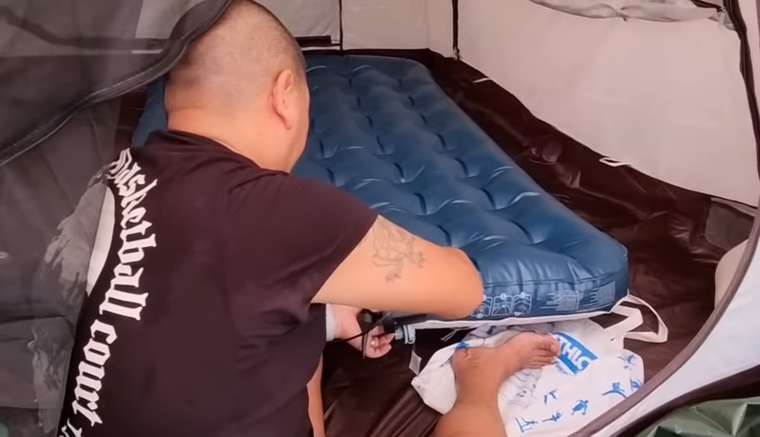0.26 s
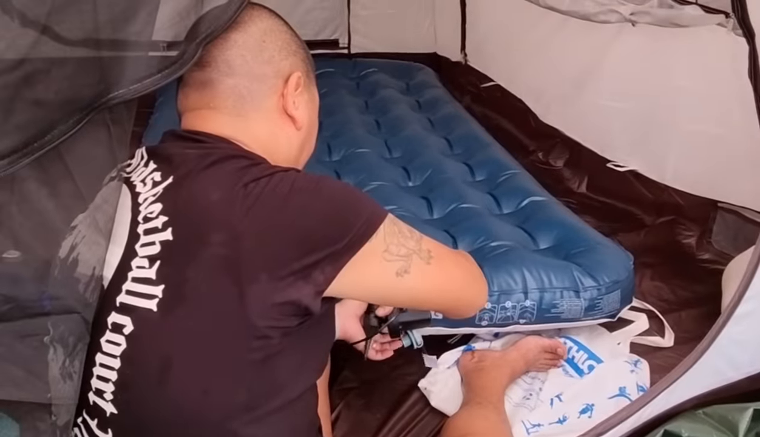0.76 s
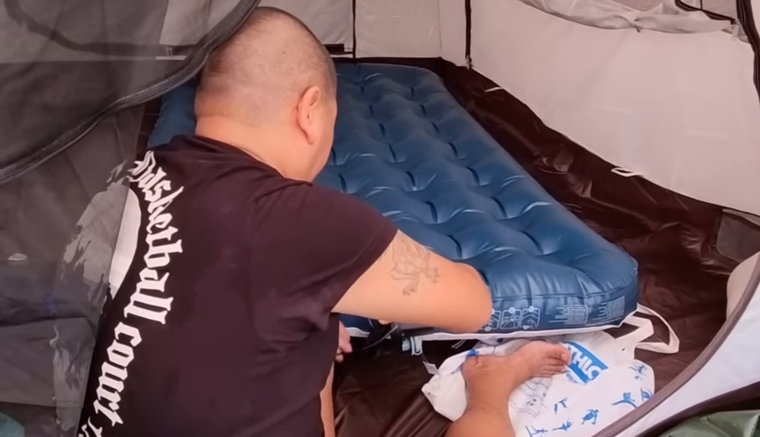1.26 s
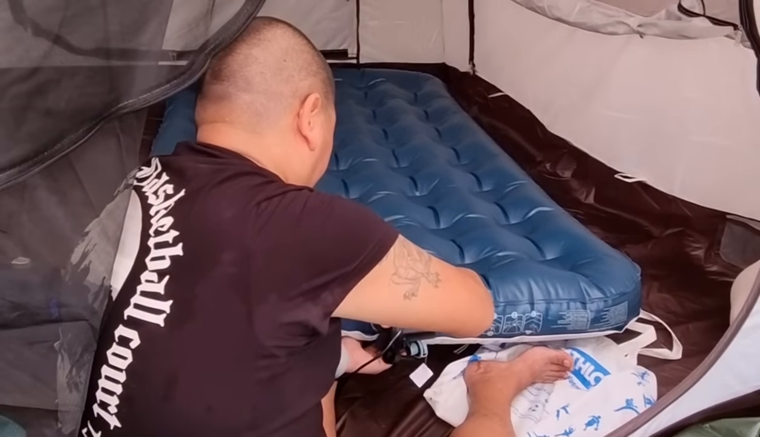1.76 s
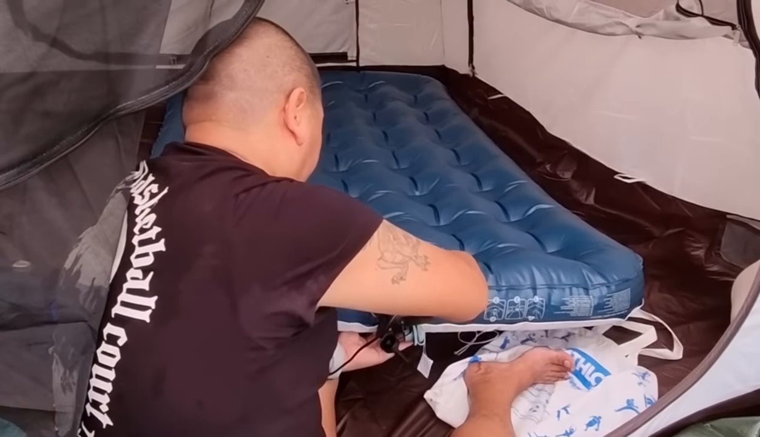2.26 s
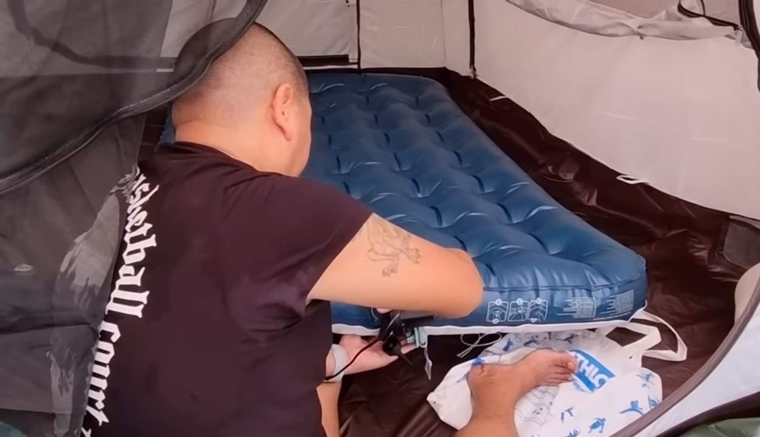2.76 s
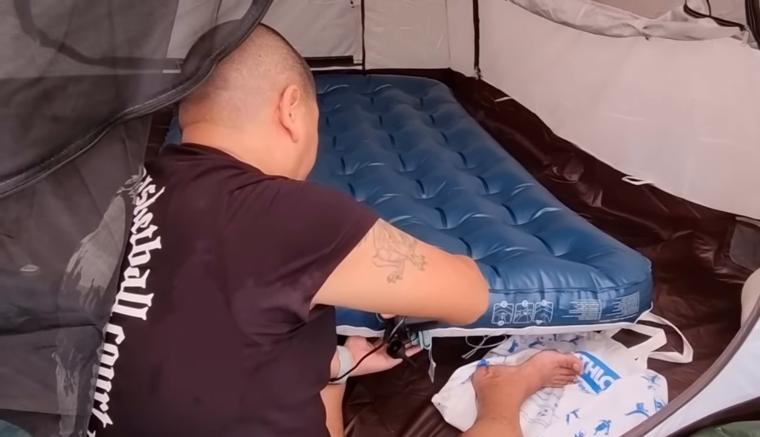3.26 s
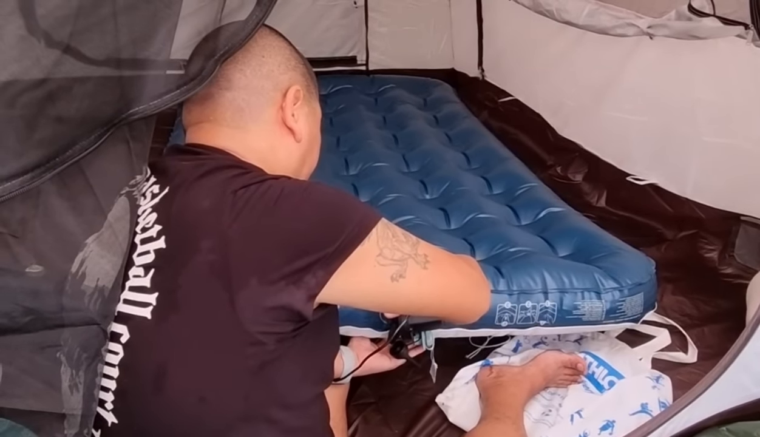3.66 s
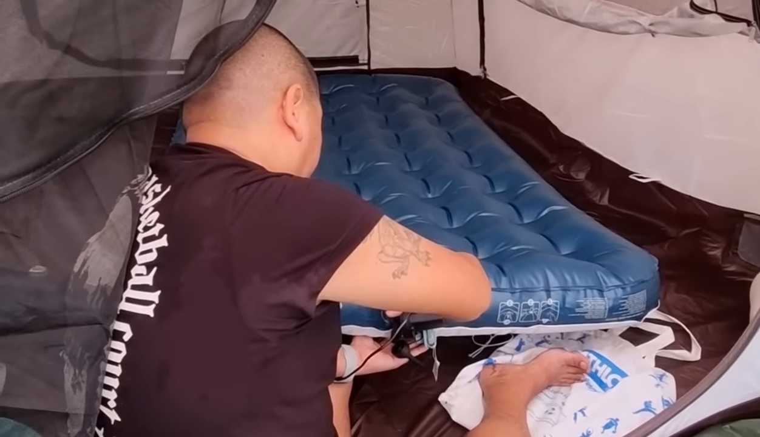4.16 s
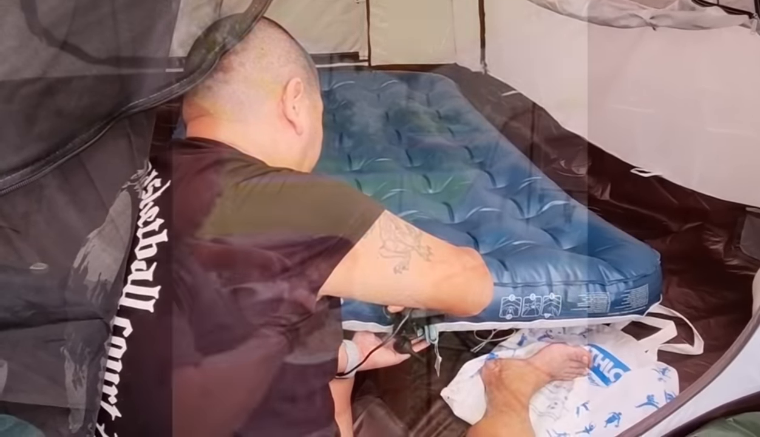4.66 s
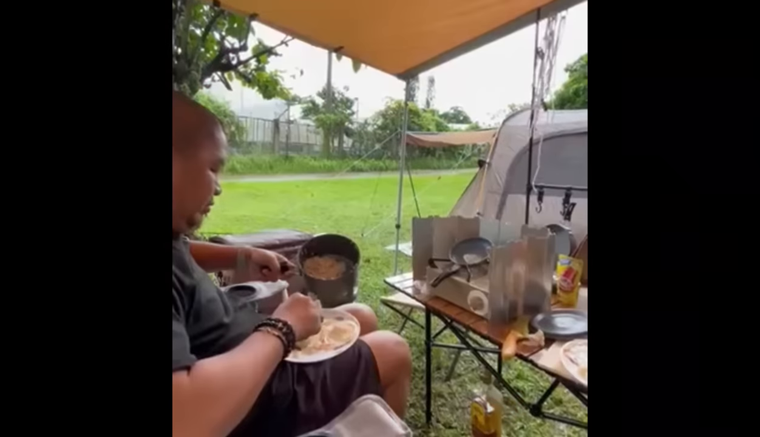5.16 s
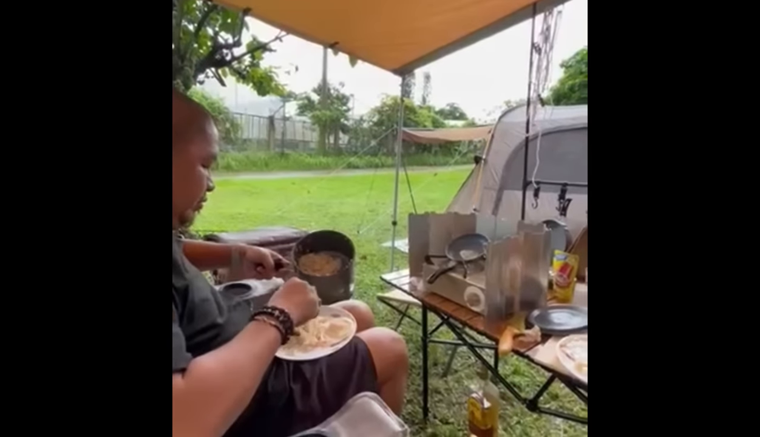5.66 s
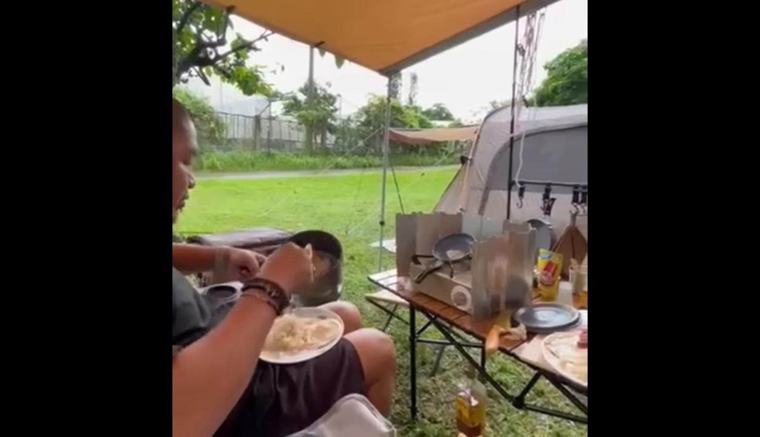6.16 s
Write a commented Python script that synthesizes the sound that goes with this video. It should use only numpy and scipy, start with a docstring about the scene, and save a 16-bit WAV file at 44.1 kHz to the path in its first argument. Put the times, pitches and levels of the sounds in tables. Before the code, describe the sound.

Close in a tent, a small electric pump whirs with a low hum, piercing whine and airy hiss. A light knock comes near one second, then the sound grows fuller as the nozzle seats, with pitch creeping upward. It cuts off abruptly, leaving a tiny silence, then a much quieter open campsite: distant traffic, short gritty rustles and soft taps of spoon, plate and pan.

```python
"""Small electric pump filling an air mattress in a tent: the shaft hums, its overtones whine and turbulent
air rings the housing and hisses, fuller once the nozzle is home in the valve; the motor slowly gains speed.
The pump sound is cut off abruptly. After a short silence comes a quiet open campsite: shaped noise and wavering
engine notes for distant traffic, short gritty noise bands that swell and die away, and struck resonances
for the soft taps of a meal."""
import sys
import numpy as np
from scipy import signal
from scipy.fft import rfft, irfft
from scipy.io import wavfile

SR = 44100
rng = np.random.default_rng(int(sys.argv[2]) if len(sys.argv) > 2 else 0)


def dump_mix(stems):
    """Bounce the given channels to the path in sys.argv[1] as a 16-bit WAV at rate SR."""
    frames = np.atleast_2d(stems).T  # one column per channel
    limited = np.clip(frames, -1, 1)  # hard clip at full scale
    pcm = np.round(limited * 32767).astype(np.int16)
    wavfile.write(sys.argv[1], SR, pcm)


N = 282681
TIME = np.arange(N) / SR
FREQ = np.arange(N // 2 + 1) * SR / N

# Motor speed, creeping up as the filling mattress throttles the flow. Each row: time in seconds, turns per second.
SPEED = [(0.06, 258.5), (0.24, 258.7), (0.36, 259.9), (0.48, 259.7), (1.32, 263.1), (1.44, 263.2),
         (2.44, 265.6), (3.04, 267.2), (3.58, 267.8), (3.78, 268.4), (4.32, 269.1), (4.7, 269.1)]
# How far the nozzle is pressed into the valve. Each row: time in seconds, seat from 0 (loose) to 1 (home).
SEAT = [(0, 0.147), (.45, 0.093), (.75, 0.132), (1.14, 0.25), (1.29, 0.677), (1.47, 0.522), (1.6, 0.376),
        (1.72, 0.474), (1.81, 0.52), (2.07, 0.748), (2.15, 0.515), (2.21, 0.86), (2.32, 0.892),
        (2.48, 0.846), (3.1, 0.886), (4.1, 1), (4.75, 0.968)]
# Overtones of shaft and blades. Each row: multiple of the shaft rate, level in dB before trim with the nozzle
# loose, half in and home, left minus right in dB, phase lead of the left ear in radians.
WHINE = [(2, -61, -70.5, -52, 6.5, 0.0), (3, -42.5, -44, -35, -21.5, 1), (4, -65.5, -57, -44, -4.5, -0.4),
         (5, -38, -46.5, -41, 3, 2), (7, -42, -53, -41.5, -5.5, -2), (8, -50.5, -65, -53, -3, 3),
         (9, -49, -54, -50, -16.5, 1.5), (10, -62.5, -49, -51, -1.5, 1), (11, -51, -59.5, -54.5, 3.5, -2.5),
         (15, -58.5, -54.5, -62.5, -3.5, -5.5), (17, -52, -65.5, -51, -10.5, -3),
         (19, -71, -67.5, -58, 0, 1), (25, -53.5, -59, -59, -3, -1.35), (36, -52, -59.5, -62.5, -5, 2.5),
         (40, -65, -65, -58, -7.5, 3.5), (42, -67, -79, -65, 0, -1), (50, -59.5, -67, -61.5, -2, 1.5),
         (54, -65, -65.5, -62, -0.5, 0)]
# Piercing overtones with level curves of their own. Each row: multiple of the shaft rate, left minus right in dB
# loose and home, lead of the left ear in radians loose and home, list of (time in seconds, level in dB).
PIERCING = [(6, 0, -4, -3.14, -1.4, [(0, -39), (.88, -40), (1, -48), (2.7, -50), (3.3, -46), (4.7, -45)]),
            (12, 0, -7, -3.0, -1.7, [(0, -43), (.5, -49), (.8, -60), (1, -53), (1.1, -45), (1.3, -45),
            (1.42, -41.5), (1.95, -42.5), (2.05, -50), (2.6, -44), (3, -41), (4.15, -43), (4.36, -50),
            (4.7, -48)]), (13, -2, -14, 2.5, 4.2, [(0, -51), (.2, -46), (.84, -54), (1.24, -52), (2.2, -53),
            (2.9, -49), (3.18, -55), (3.86, -51), (4.3, -44), (4.7, -42)]),
            (14, -5, -5, -0.7, -1.9, [(0, -58), (.38, -56), (.5, -50), (.8, -47.5), (1.08, -48),
            (1.25, -56), (2.2, -57), (2.78, -52), (2.96, -64)]), (16, -2, -6, 0.6, 2.2, [(0, -49),
            (.26, -48), (.4, -54), (.98, -57), (1.12, -48), (1.6, -52), (1.78, -58), (2.48, -52),
            (2.92, -57), (4.7, -56)]), (18, -4, -6, -0.7, 1.2, [(0, -50), (.37, -51), (.5, -60), (.9, -61),
            (.97, -49), (1.3, -55), (2, -54), (2.4, -58), (4.75, -56)]),
            (24, 0, -1, -3.1, -2.2, [(0.06, -56), (0.36, -74), (1.08, -52), (1.28, -64), (1.42, -55),
            (1.82, -61), (2.6, -57), (2.98, -48), (3.4, -62), (4.22, -59), (4.7, -55)]),
            (30, -2, -3, 1.4, 2.0, [(0, -54), (.22, -48), (.65, -50.5), (.88, -58), (1.28, -51),
            (1.58, -59), (1.9, -50.5), (2.35, -61), (2.9, -51), (3.5, -54), (4.7, -61)]),
            (35, 0, 4, 3.6, 4.2, [(0.06, -59), (0.36, -62), (0.52, -70), (0.68, -57), (1.14, -60),
            (1.92, -54), (2.1, -61), (2.46, -50), (2.62, -60), (3.82, -62), (4.5, -53), (4.7, -58)]),
            (48, -2, -5, 2, 1.8, [(0, -72), (4.1, -68), (4.3, -59), (4.7, -58)])]
# Air resonances of the housing. Each row: centre in Hz, width in Hz, level in dB relative to the rush level,
# left minus right in dB, phase lead of the left ear in radians, dB lost with the nozzle loose.
HOUSING = [(636.4, 41.3, -16, -4, -2, -5), (791.46, 51.2, -4.5, -12, -3, -2.5),
           (841.8, 54.9, -2.5, -11, 1.81, 0), (913.5, 41.5, -13.5, 17.5, 0.5, -9.5),
           (972.1, 63.7, 1.5, -2, -2, 5), (1114.3, 96, -4, -10.5, -1.5, -1.5),
           (1287, 174, -17.5, 4.5, -2, 1.5), (1504.6, 47.8, -7.5, -11.5, 5, 4),
           (1585.5, 48, -12, -7, -1, 3), (1873.6, 102, -15, 1.5, -1.5, -2.5),
           (2629, 108, -10, -5.5, 2.5, 8), (2860.3, 86.4, -15, 2.5, -3, 4), (3155, 244, -16.5, -2, 2, 2),
           (3620, 186, -21.5, -7, 2.5, 3.5), (5207, 488, -24, -2.5, 2, -2.5),
           (6550, 740, -27, -3.5, -2.5, 2)]
# Hiss of the air jet. Each row: frequency in Hz, level in dB per Hz before trim and lean, loose and home.
JET = [(200, -77.5, -77), (379, -78, -79), (512, -80.5, -77.5), (728, -77.5, -73), (1394, -78, -73),
       (1695, -79.5, -76), (1894, -80, -79.5), (2356, -75.5, -74), (3480, -83.5, -78.5), (4210, -77, -77),
       (5320, -83, -80), (5610, -86, -85), (6040, -83, -81.5), (6250, -82.5, -79.5), (6960, -83, -79.5),
       (10950, -89, -82), (11020, -89, -86.5), (15500, -85, -83)]
# Whistle at the gap round the nozzle. One row: end in seconds, length in seconds (negative: it runs back from
# the end), peak rms in dB, centre in Hz, width in Hz.
LEAK = (1.65, -0.01, -45, 4271, 41.5)
# Nozzle against valve. Each row: start in seconds, peak in dB, centre in Hz, width in Hz, t60 in seconds.
KNOCKS = [(0.949, -25.5, 1300, 1100, 0.033)]
# Spoon, plate and pan. Each row: start in seconds, peak in dB before low-pass and pan, centre in Hz,
# width in Hz, t60 in seconds.
TAPS = [(4.941, -37.5, 480, 280, .045), (5.064, -42, 350, 220, .045), (5.224, -35, 340, 200, .06),
        (5.627, -40.5, 600, 700, .035), (5.767, -38.5, 650, 700, .03), (5.950, -37.5, 7500, 6000, .025),
        (5.987, -35, 1600, 1600, .04), (6.223, -42, 520, 500, .035), (6.384, -37, 900, 600, .04),
        (6.387, -34.5, 320, 200, .05)]
# Short gritty noise bands in the open air. Each row: start in seconds, length in seconds, peak rms in dB before
# low-pass and pan, centre in Hz, width in Hz.
BURSTS = [(4.914, 0.082, -65, 6200, 1600), (5.121, 0.07, -61.5, 6200, 1600),
          (5.26, 0.207, -58.5, 5580, 2000), (5.41, .11, -60.5, 3400, 1700),
          (5.472, 0.055, -60.5, 6300, 1400), (5.546, 0.093, -57, 4550, 2800),
          (5.666, 0.0936, -54, 4000, 2600), (5.748, 0.072, -58.5, 4600, 2600),
          (5.815, 0.097, -58, 4900, 2600), (5.934, 0.101, -49, 2100, 2300), (6.003, .07, -63.5, 5600, 1800),
          (6.058, 0.153, -59, 5060, 1600), (6.169, 0.076, -55, 2900, 1400), (6.21, 0.06, -59.5, 5400, 1800),
          (6.366, 0.0516, -57, 5100, 2400)]
# Distant engines, levels before pan. Each row: loudest moment in seconds, firing rate in Hz, level in dB,
# fade in dB per second.
TENT_ENGINE = (0.73, 107, -42, 5.5)
FIELD_ENGINES = [(4.98, 166, -48.5, 45), (5.9, 85.23, -45, 30.56)]
# Low rumble through the tent wall, before pan. Each row: frequency in Hz, level in dB per Hz.
RUMBLE = [(20, -81.5), (45, -71), (75, -61), (110, -67), (148, -68.5), (162, -63.5), (178, -72.5),
          (230, -77.5), (310, -73), (400, -110), (800, -115)]
# Open air of the campsite, before low-pass and pan. Each row: frequency in Hz, level in dB per Hz.
FIELD = [(20, -100), (45, -67), (85, -66), (130, -72), (165, -68.5), (250, -76.5), (500, -84.5),
         (900, -84.5), (1900, -91), (2400, -90.5), (2900, -100), (4200, -101), (5300, -107), (7000, -103),
         (8300, -98.5), (10000, -109), (11500, -111), (13000, -130)]

# Levels with the nozzle loose and their rise as it goes home
HUM_DB, HUM_RISE_DB = -40.5, 5.5
RUSH_DB, RUSH_RISE_DB = -58, 6
TONE_JITTER_RAD, TONE_RUFFLE_DB = .07, 1.1
JET_FLUTTER_DB, JET_SWAY_DB = .7, .35
CLACK_DB = -17  # relative to the main resonance
PUMP_END_S, FIELD_START_S = 4.747, 4.861
TOP_HZ, FIELD_TOP_HZ = 15650, 11400


def shaft(wander=0.0002043, tremble=0.000334):
    """Motor shaft angle in radians: speed creeps up, wanders a little and trembles with the brushes."""
    turns_per_s = curves(SPEED)[0] * (1 + wander * walk(4) + tremble * walk(45))
    return 2 * np.pi * np.cumsum(turns_per_s) / SR


def hum(angle, seat, waver_db=0.5):
    """Unbalanced rotor shakes the housing once a turn, louder when pressed against the mattress."""
    level_db = HUM_DB + HUM_RISE_DB * seat + waver_db * walk(11)
    return np.sqrt(2) * np.sin(angle) * amp(level_db) * pan(-6.5)


def whine(angle, seat, trim_db=-0.2445, fade_db=2.5):
    """Shaft and blade overtones, fading as the hand shifts the pump among the tent's reflections."""
    out = np.zeros((2, N))
    for order, loose_db, half_db, home_db, side_db, lead_rad in WHINE:
        level_db = np.interp(seat, [0, .5, 1], [loose_db, half_db, home_db])
        level_db = level_db + trim_db + fade_db * walk(3.521)
        out += partial(order * angle, level_db, side_db, lead_rad)
    turned = np.interp(seat, [.18, .65], [0, 1])
    for order, loose_db, home_db, loose_rad, home_rad, levels in PIERCING:
        side_db = loose_db + turned * (home_db - loose_db)
        lead_rad = loose_rad + turned * (home_rad - loose_rad)
        out += partial(order * angle, curves(levels)[0], side_db, lead_rad)
    return out


def partial(angle, level_db, side_db, lead_rad):
    """One rotor tone, lightly ruffled by the air stream; its paths to the two ears shift slowly."""
    phase = angle + rng.uniform(0, 2 * np.pi) + TONE_JITTER_RAD * walk(50)
    gain = amp(level_db + TONE_RUFFLE_DB * walk(40))
    lead = lead_rad + .25 * walk(2.5)
    return np.sqrt(2) * gain * np.sin([phase + lead, phase]) * pan(side_db)


def rush(seat, flutter_db=0.0036):
    """Turbulence off the blades rings the air in the housing, with a minute flutter."""
    out = np.zeros((2, N))
    for hz, width_hz, db, side_db, lead_rad, loss_db in HOUSING:
        ears = pan(side_db) * np.exp(1j * np.array([[lead_rad], [0]]))
        ringing = irfft(resonance(hz, width_hz) * ears * noise(0.737), N)
        out += ringing * amp(db - (1 - seal(seat)) * loss_db)
    return out * amp(RUSH_DB + RUSH_RISE_DB * seal(seat, closed_at=0.912) + flutter_db * walk(220))


def jet(angle, seat, trim_db=0.15, chop=0.216, likeness=0.47, alike_below_hz=700, chops_per_turn=3):
    """Broad intake hiss, lightly chopped by the impeller; the lows lean right most and are partly alike."""
    lean = colour([1000, 4000, 12000], [-1.9, -1.2, -.5])
    air = noise(likeness / (1 + (FREQ / alike_below_hz) ** 4)) * np.array([lean, 1 / lean])
    hz, loose_db, home_db = np.transpose(JET)
    loose = irfft(air * colour(hz, loose_db), N)
    home = irfft(air * colour(hz, home_db), N)
    hiss = loose + seal(seat) * (home - loose)
    beat = 1 + chop * np.sin(chops_per_turn * angle)
    return hiss * beat * amp(trim_db + JET_FLUTTER_DB * walk(300) + JET_SWAY_DB * walk(15))


def seal(seat, closed_at=0.712):
    """Share of the gap round the nozzle that is shut; it closes before the nozzle is fully home."""
    return np.clip(seat / closed_at, 0, 1)


def leak():
    """Very brief breathy whistle of air through the gap at the valve: a narrow band of noise."""
    s, length_s, db, hz, width_hz = LEAK
    whistle = irfft(noise(0.38) * resonance(hz, width_hz), N)
    return whistle / whistle.std() * amp(db) * np.sqrt(swell(s, length_s))


def taps(table, chatter=1.94):
    """A sharp contact, then dying chatter, ring the struck thing, with a brighter clack on top."""
    out = np.zeros((2, N))
    for s, db, hz, width_hz, t60_s in table:
        age = np.clip(TIME - s, 0, 1)
        push = irfft(noise(0.676), N) * (age > 0) * np.exp(-np.log(1000) * age / t60_s)
        push *= chatter / np.linalg.norm(push[0])
        push[:, int(s * SR)] += 1  # sharp contact
        body = resonance(hz, width_hz) + amp(CLACK_DB) * resonance(2 * hz, 2 * hz)
        ring = irfft(rfft(push) * body, N)
        out += amp(db) * ring / abs(ring).max()
    return out


def bursts():
    """Short gritty noise bands that swell and die away in the open air."""
    return sum(grit(hz, width_hz) * amp(db) * swell(s, length_s)
               for s, length_s, db, hz, width_hz in BURSTS)


def grit(hz, width_hz, grains_per_s=500, grain_db=2.5):
    """A noise band roughened by fast random level changes, at an rms of 1."""
    rough = irfft(noise(0.275) * resonance(hz, width_hz), N) * amp(grain_db * walk(grains_per_s))
    return rough / rough.std()


def drone(engine, waver_db=-0.5, waver=0.02017):
    """Wavering firing note of a distant engine, fading on both sides of its loudest moment."""
    s, hz, db, fade_db_per_s = engine
    phase = 2 * np.pi * np.cumsum(hz * (1 + waver * walk(14))) / SR
    return np.sqrt(2) * np.sin(phase) * amp(db - fade_db_per_s * abs(TIME - s) + waver_db * walk(14))


def background(table, likeness, swell_db):
    """Far-off air noise shaped by a spectrum; the bass swells and is most alike in both ears."""
    low_share = 1 / (1 + (FREQ / 1500) ** 2)
    air = noise(likeness * low_share) * colour(*np.transpose(table))
    bass = irfft(air / (1 + (FREQ / 200) ** 2), N)
    return irfft(air, N) + bass * (amp(swell_db * walk(8.5)) - 1)


def amp(db):
    """Decibels to gain."""
    return 10 ** (np.asarray(db) / 20)


def curves(table):
    """Each column of a timed table, joined by straight lines."""
    s, *columns = np.transpose(table)
    return [np.interp(TIME, s, c) for c in columns]


def colour(hz, db):
    """Gain at every frequency from a few spectrum points, interpolated over log frequency."""
    return amp(np.interp(np.log(FREQ + 1), np.log(hz), db))


def resonance(hz, width_hz, order=3):
    """Steep-sided multi-stage resonance, gain 1 at the centre, -3 dB width as given."""
    f = FREQ + 1e-3  # avoids division by zero
    stage_width_hz = width_hz / np.sqrt(2 ** (1 / order) - 1)
    return 1 / (1 + 1j * (f / hz - hz / f) * hz / stage_width_hz) ** order


def walk(points_per_s):
    """Smooth random wandering with a spread of 1."""
    count = int(N / SR * points_per_s) + 4
    fine = signal.resample(rng.standard_normal(count), count * 8)
    return np.interp(TIME * points_per_s * 8, np.arange(len(fine)), fine)


def swell(s, length_s):
    """Smooth rise and fall; a negative length runs back from s."""
    return np.sin(np.pi * np.clip((TIME - s) / length_s, 0, 1)) ** 2


def pan(side_db):
    """Left and right gains of constant power for a left-minus-right level."""
    gains = amp(np.array([[1], [-1]]) * side_db / 2)
    return gains / np.sqrt(np.mean(gains ** 2, axis=0))


def noise(likeness):
    """White noise spectra at 0 dB per Hz for two ears that share a part of their power."""
    draws = rng.standard_normal((3, len(FREQ))) + 1j * rng.standard_normal((3, len(FREQ)))
    shared, *own = draws * np.sqrt(N * SR) / 2
    share = np.clip(likeness, 0, 1)
    return np.sqrt(share) * shared + np.sqrt(1 - share) * np.array(own)


def low_pass(x, hz):
    """Steep elliptic treble cut."""
    return signal.sosfilt(signal.ellip(12, .1, 90, hz, fs=SR, output="sos"), x)


def scene():
    """Pump in the tent, a moment of silence, then the open campsite."""
    angle = shaft()
    seat = np.clip(curves(SEAT)[0], 0, 1)
    pump = hum(angle, seat) + whine(angle, seat) + rush(seat) + jet(angle, seat) + leak() + taps(KNOCKS)
    tent_air = background(RUMBLE, likeness=0.94, swell_db=-2.0) + drone(TENT_ENGINE)
    tent = pump + tent_air * pan(-4.0)
    field_air = background(FIELD, likeness=0.998, swell_db=1.5) + sum(map(drone, FIELD_ENGINES))
    outside = low_pass(field_air + bursts() + taps(TAPS), FIELD_TOP_HZ) * pan(0.65)
    in_tent = np.clip((PUMP_END_S - TIME) / .006 + .5, 0, 1)
    in_field = np.clip((TIME - FIELD_START_S) / .004, 0, 1)
    return tent * in_tent + outside * in_field


def record(dry):
    """Steep cut of everything above TOP_HZ."""
    return low_pass(dry, TOP_HZ)


dry = scene()
out = record(dry)
dump_mix(out)
```